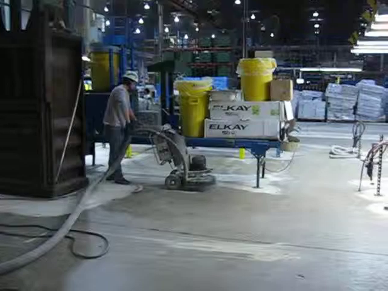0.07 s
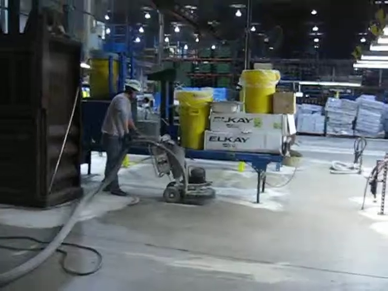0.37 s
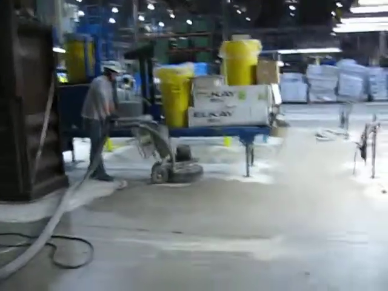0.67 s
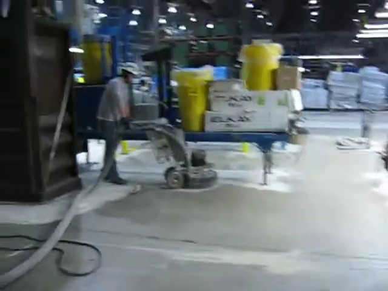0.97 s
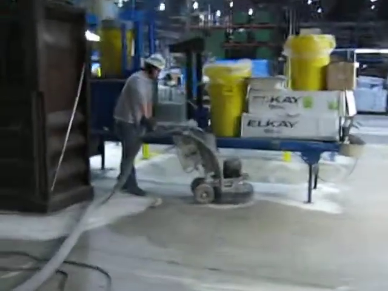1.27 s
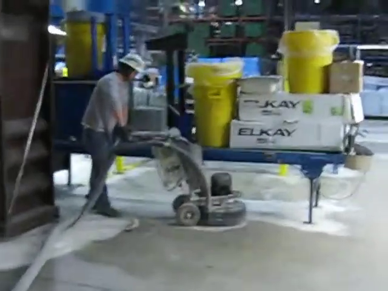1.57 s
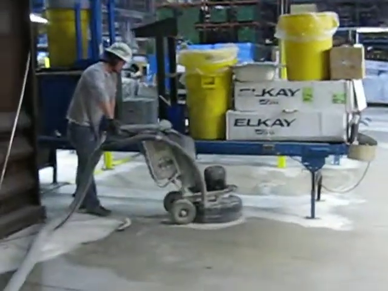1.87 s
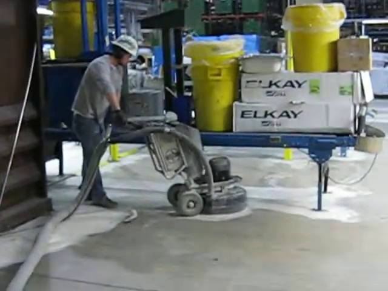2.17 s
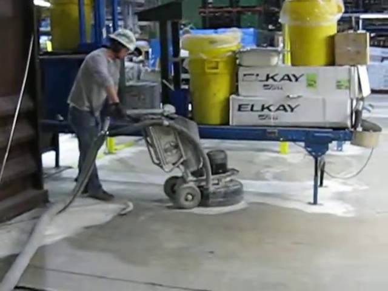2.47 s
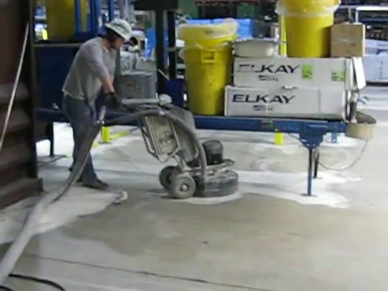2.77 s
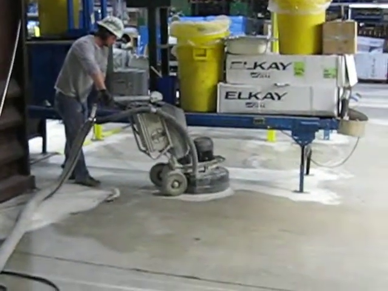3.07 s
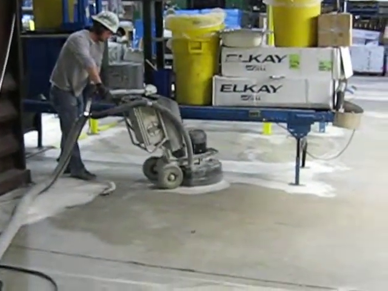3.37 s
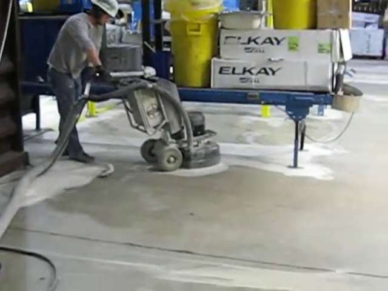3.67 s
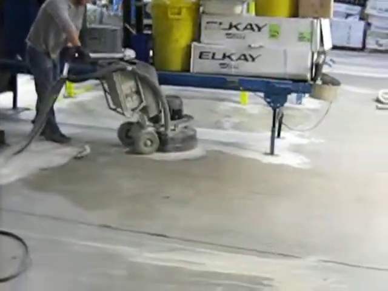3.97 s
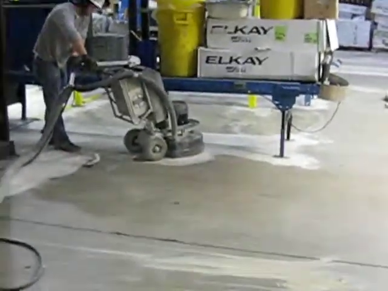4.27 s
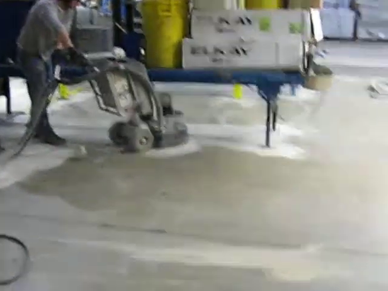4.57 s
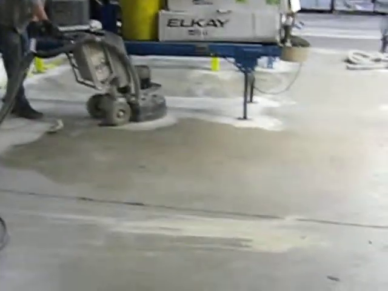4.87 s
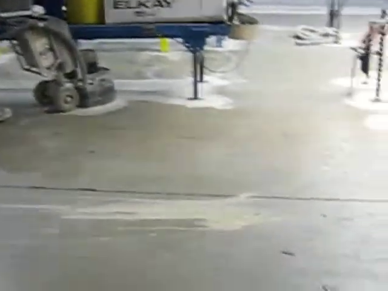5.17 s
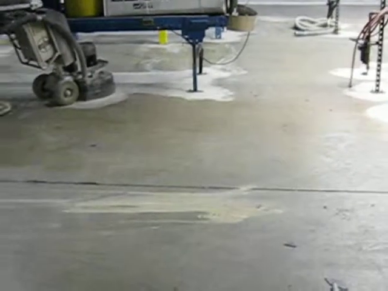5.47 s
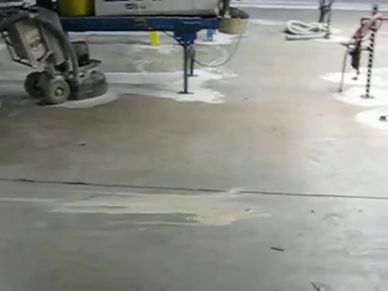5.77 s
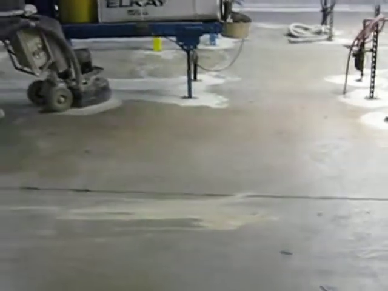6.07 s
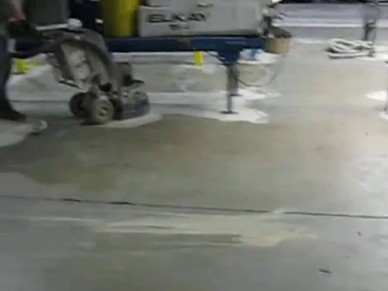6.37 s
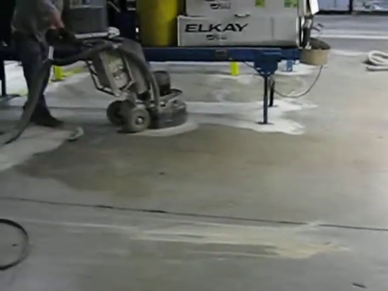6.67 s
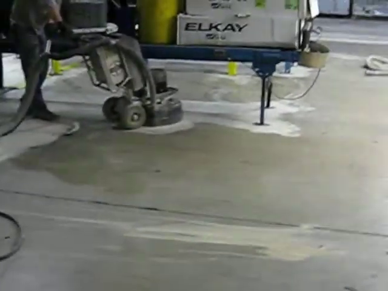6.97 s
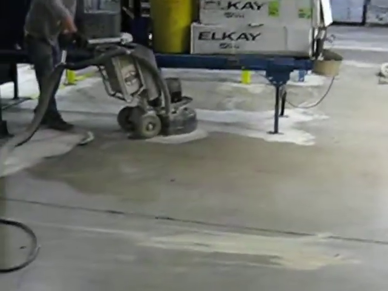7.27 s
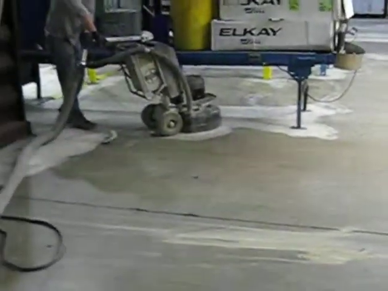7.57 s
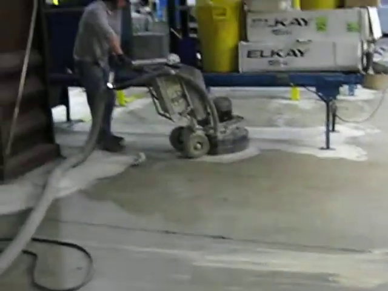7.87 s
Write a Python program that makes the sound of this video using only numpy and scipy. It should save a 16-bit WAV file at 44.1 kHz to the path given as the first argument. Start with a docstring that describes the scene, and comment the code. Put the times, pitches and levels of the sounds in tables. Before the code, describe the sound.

A walk-behind floor grinder runs continuously on concrete, a few metres away in a large warehouse. Its motor hums and its gears whine over a rough rumble, scrape and gritty hiss, while a dust extractor drones and whistles. Thin, high squeals come mostly at the start. About halfway through, the whine sags slightly in pitch. The hall blurs everything into a steady roar.

```python
"""A walk-behind floor grinder works on concrete in a warehouse, a few metres away.
Its gears whine and sag in pitch as the load grows; its shaft hum beats against the steady motor
of the dust extractor, whose turbine whistles. Abrasive segments rumble, scrape and hiss, and squeal
mostly at first. The hall blurs the grinding into a roar; its standing waves make tones swell and fade."""
import sys
import numpy as np
from scipy import signal
from scipy.fft import rfft, irfft
from scipy.io import wavfile

SR = 44100
rng = np.random.default_rng(int(sys.argv[2]) if len(sys.argv) > 2 else 0)


def master_out(mix):
    """Clip the mix to full scale and print it as 16-bit PCM to the path in sys.argv[1]."""
    frames = np.transpose(np.atleast_2d(mix))
    ceiling = np.clip(frames, -1, 1)
    pcm = np.round(ceiling * 32767).astype(np.int16)
    wavfile.write(sys.argv[1], SR, pcm)


N = 348831


def undb(db):
    """Decibels to gain."""
    return 10 ** (np.asarray(db) / 20)


def unit_rms(x):
    """Scale to rms 1."""
    return x / np.sqrt(np.mean(x ** 2))


def curves(table):
    """Per-sample curve of each column after the first, which is time in seconds."""
    times_s, *columns = np.transpose(table)
    return [np.interp(np.arange(N) / SR, times_s, column) for column in columns]


def drift(rate_hz):
    """Smooth random curve, rms 1, band-limited to about rate_hz."""
    hz = np.arange(N // 2 + 1) * SR / N
    return unit_rms(irfft(rfft(rng.standard_normal(N)) / (1 + (hz / rate_hz) ** 4), N))


def colour(x, points):
    """Filter by (Hz, dB) points; rms 1."""
    hz, db = np.transpose(points)
    log_hz = np.log(np.arange(N // 2 + 1) * SR / N + 1)
    gain_db = np.interp(log_hz, np.log(hz), db, left=-60, right=-80)
    return unit_rms(irfft(rfft(x) * undb(gain_db), N))


def tone(hz, db, scatter, scatter_hz):
    """Machine tone plus a wavering copy from hall reflections."""
    phase = 2 * np.pi * (np.cumsum(hz * np.ones(N)) / SR + rng.random())
    steps = np.arange(N) / SR * scatter_hz
    knots = rng.standard_normal((2, 2048))
    in_phase, quadrature = (np.interp(steps, np.arange(len(k)), k) for k in knots)
    wave = (1 + scatter * in_phase) * np.sin(phase) + scatter * quadrature * np.cos(phase)
    return undb(db) * unit_rms(wave)


def by_load(load, free_db, loaded_db):
    """Level between free running (load 0) and full load (1)."""
    return free_db + load * (loaded_db - free_db)


def fading_orders(base_hz, orders, load, scatter, scatter_hz, fade_db=2.2):
    """Multiples of base_hz; each follows the load and fades on its own in the hall's standing waves."""
    out = np.zeros(N)
    for order, free_db, loaded_db in orders:
        hz = order * base_hz
        hall_db = fade_db * np.minimum(drift(rate_hz=3.2), 1) + swell_db(hz)
        out += tone(hz, by_load(load, free_db, loaded_db) + hall_db, scatter, scatter_hz)
    return out


# Gear whine among the standing waves. Each row: time in seconds, level in dB before trim.
WHINE_DB = [(0.09, -32.5), (0.46, -23.5), (0.61, -29.5), (0.72, -42), (0.81, -27), (1.11, -31.5),
            (1.26, -22), (1.61, -31.5), (1.76, -24), (2.05, -37.5), (2.11, -27.5), (2.35, -26.5),
            (2.55, -34.5), (3.22, -39.5), (3.46, -28), (3.85, -27.5), (4.0, -36), (4.2, -25), (4.57, -25.5),
            (4.89, -33), (5.29, -25), (6.01, -30.5), (6.53, -26), (7.23, -29), (7.51, -25.5), (7.9, -35)]
# Weaker gear tones. Each row: multiple of the mesh rate, free level in dB, loaded level in dB.
MESH_ORDERS = [(0.4609, -51, -44.5), (1.779, -40, -43.5), (2, -44, -42.5), (3, -45, -49), (4, -43, -57),
               (6, -60.5, -57)]

def gearbox(mesh_hz, load, trim_db=0.65):
    """Meshing teeth: a strong whine, its overtones and a second stage."""
    whine_db, = curves(WHINE_DB)
    whine = tone(mesh_hz, whine_db + trim_db, scatter=0.11, scatter_hz=29.76)
    return whine + fading_orders(mesh_hz, MESH_ORDERS, load, scatter=0.087, scatter_hz=21.76)


# Shaft hum at twice the turning rate. Each row: time in seconds, level in dB before trim.
HUM_DB = [(0.09, -42), (0.17, -25.5), (1.61, -36.5), (1.81, -50), (1.89, -32.5), (4.14, -29), (5.77, -40.5),
          (7.16, -34.5), (7.9, -36.5)]
# Other shaft tones. Each row: multiple of the turning rate, free dB, loaded dB, scatter from 0 to 1.
UNBALANCE_ORDERS = [(1, -53, -40, .08), (3, -42, -37, .25)]

def shaft(turn_hz, load, trim_db=-2.1):
    """The spinning shaft shakes the housing at its first three orders."""
    hum_db, = curves(HUM_DB)
    out = tone(2 * turn_hz, hum_db + trim_db, scatter=0.046, scatter_hz=7.4)
    unbalance = load ** 2.5  # shakes hard only near full load
    for order, free_db, loaded_db, scatter in UNBALANCE_ORDERS:
        hz = order * turn_hz
        out += tone(hz, by_load(unbalance, free_db, loaded_db) + swell_db(hz), scatter, scatter_hz=6)
    return out


# Motor drone. Each row: time in seconds, level in dB.
DRONE_DB = [(0, -33), (1.8, -30.5), (2.5, -34.5), (4, -34), (5.5, -35.5), (7.9, -39.5)]
# Steady extractor tones. Each row: frequency in Hz, level in dB.
STEADY_TONES = [(173.2, -44), (260, -39), (267, -43), (438, -42.5)]
# Turbine speed. Each row: time in seconds, rotation in Hz.
TURBINE_HZ = [(0, 502), (2.1, 501.5), (3.2, 503.5), (3.6, 506.3), (4.5, 506.7), (5.4, 505), (7.9, 505.3)]
# Turbine whistle. Each row: multiple of the rotation, dB with the grinder free, dB with it loaded.
WHISTLE_ORDERS = [(1, -40.5, -44), (2, -48.5, -48), (3, -42.5, -47), (4, -41, -52.5), (6, -53, -53.5)]

def extractor(load, drone_hz=86.6):
    """Dust extractor: the motor drones, the turbine whistles."""
    turbine_hz, = curves(TURBINE_HZ)
    drone_db, = curves(DRONE_DB)
    drone = tone(drone_hz, drone_db, scatter=0.088, scatter_hz=3.7)
    steady = sum(tone(hz, db, scatter=0.69, scatter_hz=7) for hz, db in STEADY_TONES)
    whistle = fading_orders(turbine_hz, WHISTLE_ORDERS, load, scatter=0.3, scatter_hz=22.04)
    return drone + steady + whistle


def hall(x, t60_s=1.87, wet_db=3):
    """Direct sound plus a dense, slowly dying tail."""
    t = np.arange(SR) / SR
    tail = rng.standard_normal(SR) * undb(-60 * t / t60_s) * (t > .008)
    return x + undb(wet_db) * signal.fftconvolve(x, tail / np.linalg.norm(tail))[:N]


def fractures(per_s, spread_db):
    """Dense small fractures of unequal size, heard through the hall."""
    hits = (rng.random(N) < per_s / SR) * rng.standard_normal(N)
    size_db = spread_db * np.minimum(rng.exponential(size=N), 3)
    return unit_rms(hall(hits * undb(size_db)))


# Bite of the segments. Each row: time in seconds, scrape in dB, grit hiss in dB, both before trim.
BITE_DB = [(0.09, -25.5, -30), (0.55, -29.5, -34), (0.66, -27.5, -31.5), (1.37, -29, -35),
           (2.09, -29, -33.5), (2.48, -32.5, -38), (3.09, -30, -36.5), (4.53, -32.5, -37.5),
           (5.27, -31, -36.5), (5.49, -34, -39.5), (6.07, -31, -37), (6.68, -32, -37.5), (6.88, -30, -36.5),
           (7.81, -32.5, -37.5), (7.9, -30, -36.5)]
# Housing rumble. Each row: time in seconds, level in dB before trim.
HOUSING_DB = [(0.09, -30), (1.5, -32.5), (1.57, -27), (1.63, -30.5), (2.72, -32), (5.09, -33), (5.16, -32),
              (5.49, -34.5), (7.88, -32.5), (7.9, -30)]
# Spectra of rumble, scrape, grit and fine hiss. Each row: frequency in Hz, relative gain in dB.
RUMBLE_SPECTRUM = [(15, -7), (27, -11), (42, -14), (60, -1.5), (80, -9), (120, -0.5), (200, 2), (230, -2.5),
                   (270, 5), (330, 2), (420, 1.5), (560, -9), (900, -39.5)]
SCRAPE_SPECTRUM = [(300, -36.5), (480, -1), (680, 2), (850, 0.5), (1100, -3.5), (1400, -5.5), (1900, -12),
                   (2600, -20), (4000, -44.5)]
GRIT_SPECTRUM = [(1000, -20.5), (1700, 2), (2200, 0.5), (3000, 0.5), (3800, 0), (4200, -2.5), (4600, -17),
                 (5200, -37)]
FINE_SPECTRUM = [(3600, -18), (4400, 1), (4800, -0.5), (5150, -4.5), (5400, -4), (5700, -13), (6000, -24),
                 (6300, -38.5)]

def grinding(rumble_trim_db=1.5, scrape_trim_db=0.94, grit_trim_db=2):
    """Segments bite unevenly: the housing rumbles, the slab scrapes, grit hisses."""
    scrape_db, grit_db = curves(BITE_DB)
    rumble_db, = curves(HOUSING_DB)
    fine_db = -45.5 + 1.3 * (grit_db - grit_db.mean())  # louder hiss is also sharper
    bite = drift(rate_hz=16)
    rumble = colour(rng.standard_normal(N), RUMBLE_SPECTRUM)
    scrape = colour(fractures(per_s=12000, spread_db=2.2), SCRAPE_SPECTRUM)
    grit = colour(fractures(per_s=10000, spread_db=2.3), GRIT_SPECTRUM)
    fine = colour(fractures(per_s=10000, spread_db=8.6), FINE_SPECTRUM)
    return (rumble * undb(rumble_db + rumble_trim_db + 0.6 * bite)
            + scrape * undb(scrape_db + scrape_trim_db + 0.35 * bite)
            + grit * undb(grit_db + grit_trim_db + 0.51 * bite)
            + fine * undb(fine_db + 0.7 * bite))


# Squeals on the slab. Each row: start and end in seconds, pitch and width in Hz, dB before trim.
SEGMENT_SQUEALS = [(0.02, 0.57, 4980, 35, -44.5), (0.58, 1.0, 4990, 28, -43.5),
                   (0.97, 1.33, 4945, 25, -45.5), (0.02, 0.62, 4275, 30, -47), (0.61, 0.86, 4268, 22, -38),
                   (0.85, 1.17, 4268, 30, -48), (2.0, 2.9, 4090, 30, -52), (5.3, 6.1, 3875, 30, -50),
                   (6.0, 6.7, 3800, 30, -48), (7.7, 8.0, 3770, 30, -48)]

def squeals(fade_s=0.019, trim_db=1):
    """Friction keeps narrow resonances of the segments ringing, unsteadily."""
    t = np.arange(N) / SR
    out = np.zeros(N)
    for start_s, end_s, hz, width_hz, db in SEGMENT_SQUEALS:
        contact = np.clip(np.minimum(t - start_s, end_s - t) / fade_s, 0, 1)
        out += contact * tone(hz, db + trim_db, scatter=.5, scatter_hz=2 * width_hz)
    return out


# Single tones ringing out. Each row: centre in seconds, half length in seconds, pitch in Hz, lift in dB.
TONE_SWELLS = [(.47, .1, 1505, 6.5), (0.712, 0.058, 2006, 5), (1.052, 0.1, 1433, 12.5),
               (1.35, 0.11, 2006, 9.5), (1.467, 0.13, 850, 8.5), (1.54, .08, 1433, 11.5),
               (1.6, .1, 1505, 7), (1.968, 0.07, 1433, 9), (2.948, .42, 2012, 3), (3.17, 0.053, 1510, 8.5),
               (3.2, 0.15, 850, 6), (3.381, 0.23, 504, 9.5), (3.4, .08, 1905, 10),
               (3.524, 0.26, 1518, 10.5), (4.081, .25, 242, 7), (4.344, 0.076, 1520, 10.5),
               (4.83, .08, 930, 5.5), (5.22, 0.083, 928, 10), (5.315, 0.092, 3030, 11),
               (5.56, .06, 1515, 7), (6.304, 0.51, 241, 6.5), (7.448, .12, 928, 8.5)]

def swell_db(hz, pitch_tolerance=.02):
    """Lift of a machine tone near a listed pitch as it rises over the roar and sinks back."""
    t = np.arange(N) / SR
    mean_hz = np.mean(hz)
    return sum(lift_db * np.exp(-((t - centre_s) / half_s) ** 2)
               for centre_s, half_s, tone_hz, lift_db in TONE_SWELLS
               if abs(mean_hz / tone_hz - 1) < pitch_tolerance)


# Grinder speed. Each row: time in seconds, gear mesh rate in Hz.
MESH_HZ = [(0, 477.4), (.7, 478.6), (1.5, 477.4), (2.4, 478), (3.3, 477.3), (3.6, 467), (4.7, 466.2),
           (5.2, 463.7), (7.9, 463.8)]
FREE_HZ, LOADED_HZ, MESH_PER_TURN = 478, 464, 5.783

def scene():
    """Grinder and extractor running together; the sag in speed gives the load."""
    mesh_hz, = curves(MESH_HZ)
    turn_hz = mesh_hz / MESH_PER_TURN
    load = np.clip((FREE_HZ - mesh_hz) / (FREE_HZ - LOADED_HZ), 0, 1)
    return (gearbox(mesh_hz, load) + shaft(turn_hz, load) + extractor(load) + grinding() + squeals())[None]


START_S, LOWPASS_HZ = .0715, 6150

def record(dry):
    """The sound cuts in after a moment and has little treble."""
    gate = np.arange(N) / SR >= START_S
    lowpass = signal.ellip(10, .2, 80, LOWPASS_HZ, fs=SR, output="sos")
    return signal.sosfilt(lowpass, dry * gate)


dry = scene()
out = record(dry)
master_out(out)
```